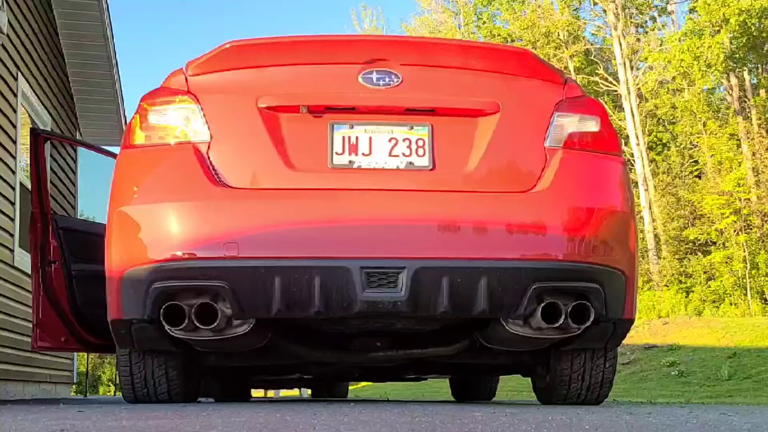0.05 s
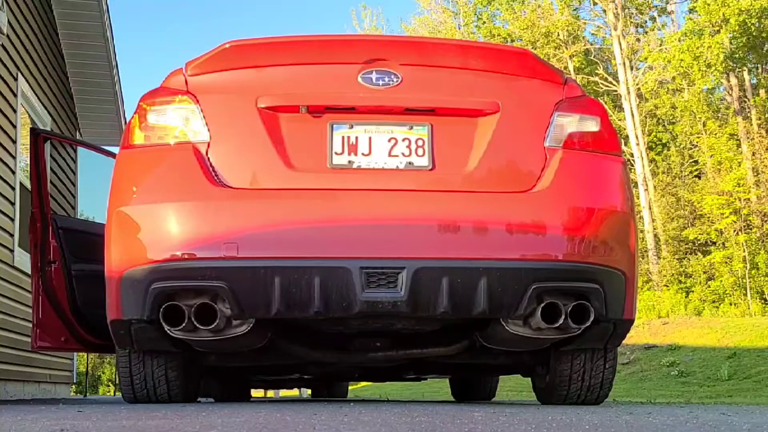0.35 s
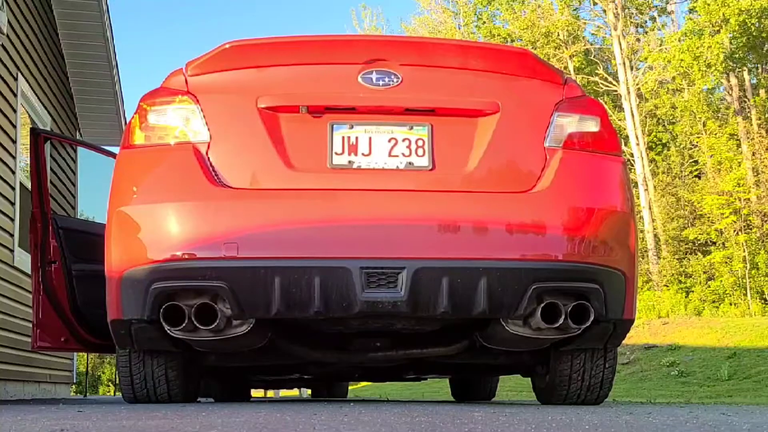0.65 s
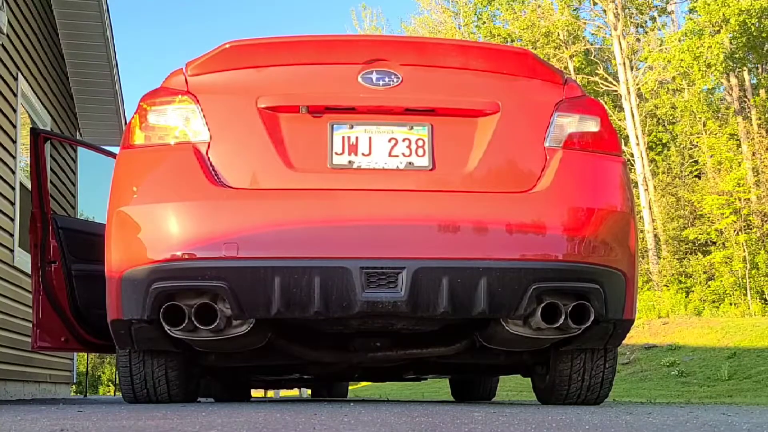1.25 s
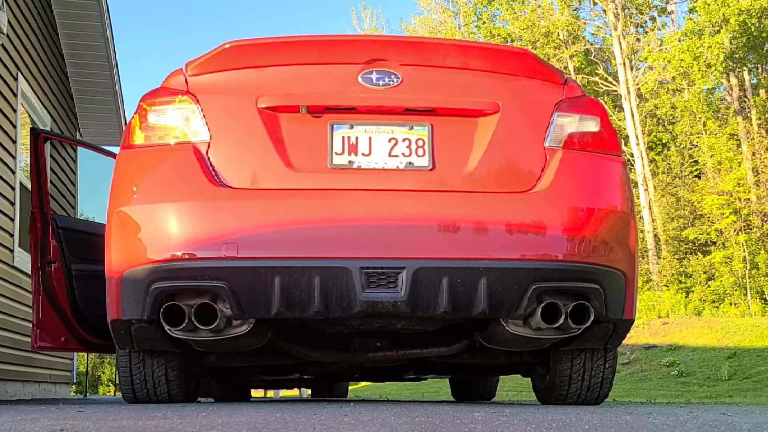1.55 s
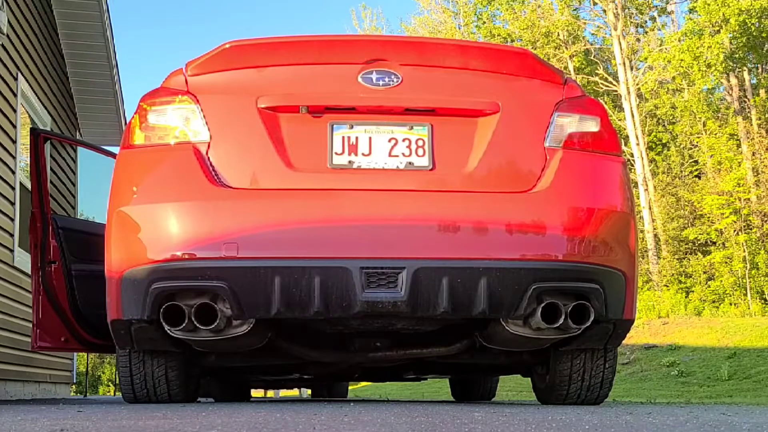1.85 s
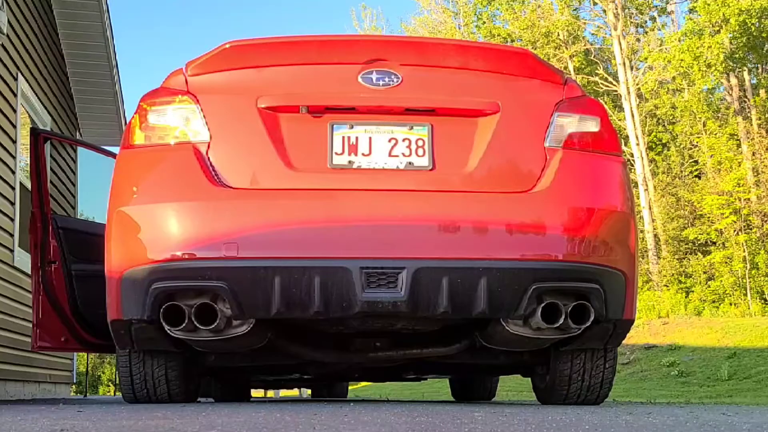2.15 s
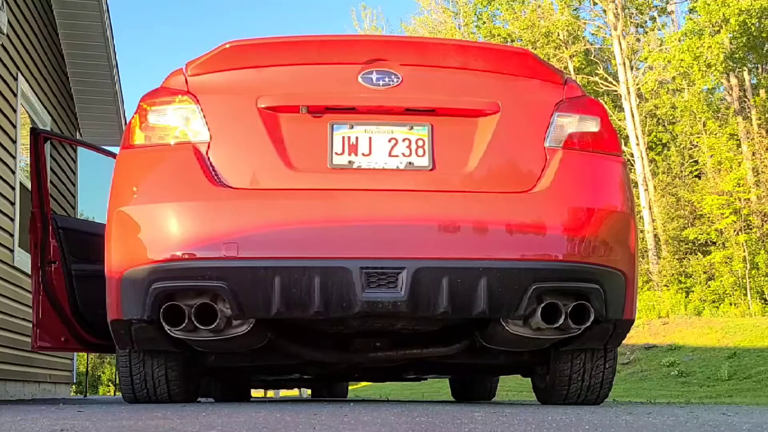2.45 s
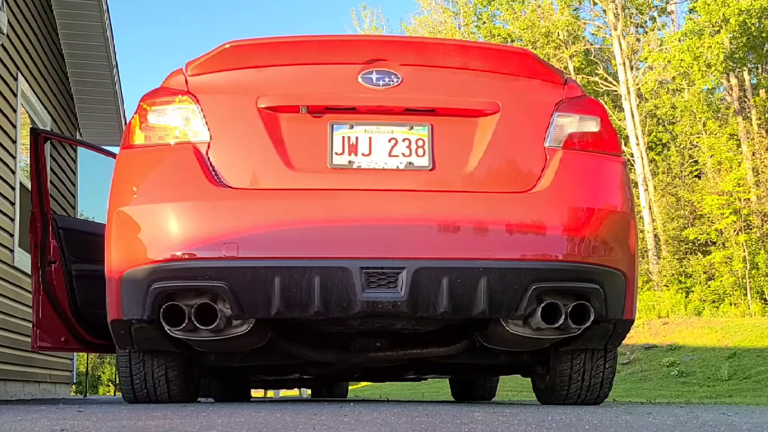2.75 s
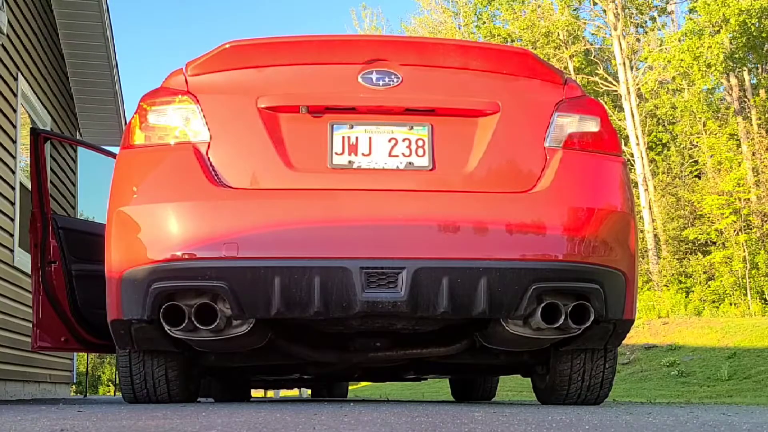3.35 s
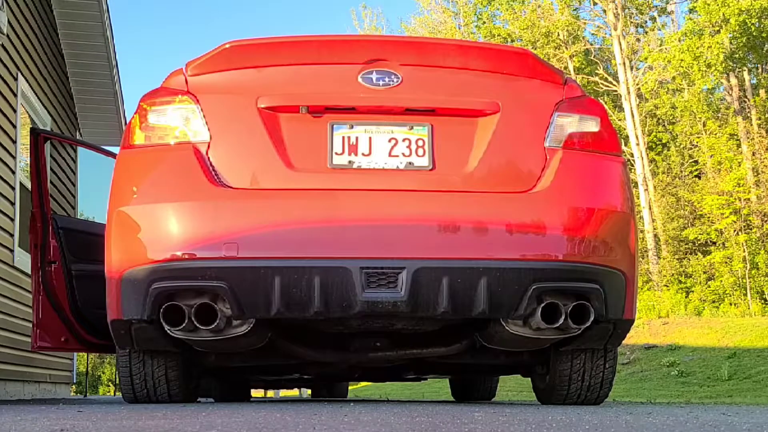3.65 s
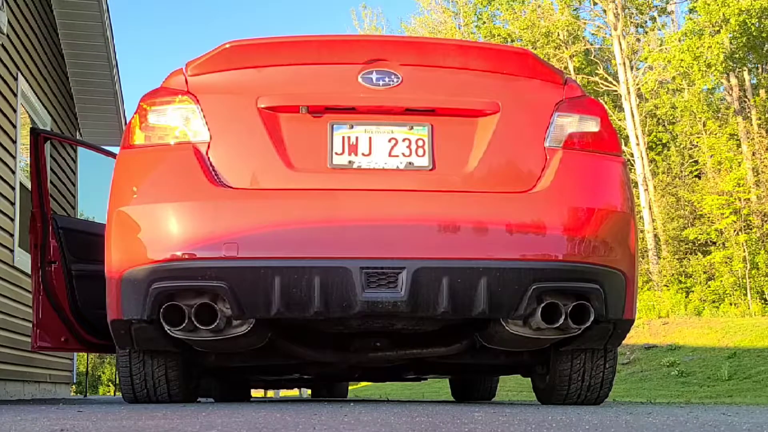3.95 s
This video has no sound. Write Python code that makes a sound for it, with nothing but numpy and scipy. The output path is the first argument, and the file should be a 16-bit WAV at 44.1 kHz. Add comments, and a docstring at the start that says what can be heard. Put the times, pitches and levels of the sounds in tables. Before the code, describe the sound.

A car engine cranks, catches with a boom, flares and drops to a raspy idle.

```python
"""Faint birdsong over quiet outdoor air, then cabin knocks and ignition clicks: a four-cylinder car is
started on a driveway beside a house, heard from just behind its tailpipes. The starter's gear teeth
grind and whine while unfired air throbs in the silencer. The engine catches with a boom, flares up as
its firing pulses ring the exhaust pipes, then drops to a harder, raspier fast idle."""
import sys
import numpy as np
from scipy import signal
from scipy.fft import rfft, irfft
from scipy.io import wavfile
from scipy.ndimage import uniform_filter1d, minimum_filter1d

SR = 44100
rng = np.random.default_rng(int(sys.argv[2]) if len(sys.argv) > 2 else 0)


def output_pcm(signal):
    """Save a mono or channel-first signal as 16-bit PCM at the path in sys.argv[1].

    Samples are clipped to [-1, 1] before scaling.
    """
    pcm = np.clip(np.atleast_2d(signal).T, -1, 1) * 32767
    wavfile.write(sys.argv[1], SR, np.round(pcm).astype(np.int16))


N = 176400
T = np.arange(N) / SR
FLARE_S = 2.653

# crankshaft speed: time_s, turns_per_s
CRANK_SPEED = [(2.27, 20), (2.45, 21), (2.49, 21.8), (2.555, 26.3), (2.6, 29), (2.68, 31.6), (2.772, 34.8),
               (2.908, 36.5), (3.018, 36.9), (3.118, 36.1), (3.348, 34.9), (3.426, 34), (3.526, 33.2),
               (3.886, 32.7), (4, 32.5)]


def amp(db):
    """Decibels to gain."""
    return 10 ** (np.asarray(db) / 20)


def unit(x):
    """Scale to rms 1."""
    return x / np.sqrt(np.mean(x ** 2) + 1e-20)


def curve(rows, column=1):
    """Table column, linearly interpolated over time."""
    rows = np.array(rows)
    return np.interp(T, rows[:, 0], rows[:, column])


def colour(x, rows):
    """Filter by rows of freq_hz, gain_db."""
    rows, hz = np.array(rows), np.fft.rfftfreq(2 * N, 1 / SR)
    gain_db = np.interp(np.log(hz + 1), np.log(rows[:, 0] + 1), rows[:, 1])
    return irfft(rfft(x, 2 * N) * amp(gain_db))[:N]


def noise():
    """White noise."""
    return rng.standard_normal(N)


def drift(hz):
    """Random wander below hz, rms 1."""
    return unit(irfft(rfft(noise()) * (np.fft.rfftfreq(N, 1 / SR) < hz), N))


def ring(x, modes):
    """Bank of band-pass resonances."""
    return sum(amp(db) * signal.lfilter(*signal.iirpeak(hz, hz / width, SR), x)
               for hz, width, db in modes)


def bursts(events, spectrum, decay_s, attack_s=0.00145):
    """Coloured noise that rises quickly to each event and dies away."""
    envelope = sum(amp(db) * np.exp(-abs(T - s) / np.where(T < s, attack_s, decay_s))
                   for s, db in events)
    return unit(colour(noise(), spectrum)) * envelope


def swell(start_s, rise_s, decay_s):
    """Soft-rising envelope, peak 1."""
    age_s = np.maximum(T - start_s, 0)
    shape = (1 - np.exp(-age_s / rise_s)) ** 2 * np.exp(-age_s / decay_s)
    return shape / shape.max()


def glide(rows, blur_hz):
    """Fuzzy whistle along rows of time_s, pitch_hz, level_db."""
    on = (T > rows[0][0]) * (T < rows[-1][0])
    tone = np.sin(2 * np.pi * np.cumsum(curve(rows)) / SR)
    return on * amp(curve(rows, 2)) * (0.5 + drift(blur_hz)) * tone


def scatter(x, decay_s):
    """Dense decaying reflections with a flat spectrum."""
    tail = rfft(noise()[:SR] * np.exp(-T[:SR] / decay_s))
    return signal.fftconvolve(x, irfft(tail / abs(tail))[:SR // 2])[:N]


def spread(x):
    """Ground and wall reflections widen the upper range."""
    # stereo image: freq_hz, side_minus_mid_db, left_minus_right_db
    image = [(170, -22.5, -1), (400, -7.5, -1), (1190, -8.5, -0.5), (2400, -1, -3), (4800, 2.5, 6.5),
             (15000, -1, 1.5)]
    side = colour(scatter(x, decay_s=0.011), image)
    left = colour(x + side, [(hz, lean / 2) for hz, _, lean in image])
    right = colour(x - side, [(hz, -lean / 2) for hz, _, lean in image])
    return np.array([left, right])


def direct(x, lag_s=0.00028):
    """Direct sound reaches the left microphone slightly early."""
    return np.array([np.interp(T + lag_s / 2, T, x) * amp(-0.9),
                     np.interp(T - lag_s / 2, T, x) * amp(0.38)])


def air(level_db=-56, sway_db=3):
    """Quiet outdoor air whose rumble comes and goes."""
    # air noise: freq_hz, gain_db
    spectrum = [(20, -17.5), (65, 4), (170, -6), (250, -13), (750, -17), (1100, -23.5), (2000, -27.5),
                (3000, -25), (6000, -38.5), (9000, -51), (15500, -51)]
    wash = unit(colour(noise(), spectrum))
    rumble = signal.sosfiltfilt(signal.butter(2, 220, fs=SR, output="sos"), wash)
    return amp(level_db) * (wash + rumble * (amp(sway_db * drift(18)) - 1))


def birds():
    """Distant gliding, fluttering calls, blurred by trees."""
    # calls, one list per phrase: time_s, pitch_hz, level_db
    phrases = [
        [(.12, 4610, -67.5), (.23, 5900, -64.5), (.32, 5590, -70.5), (.52, 5830, -68)],
        [(.36, 3170, -80), (.4, 2490, -69.5), (.6, 3290, -70)],
        [(.76, 3840, -72.5), (.84, 2330, -65), (.87, 3110, -54), (.92, 2740, -54), (.955, 3940, -62)],
        [(.49, 6570, -70), (.65, 7150, -72.5), (.93, 7300, -83)],
    ]
    # flutter bandwidth per phrase: blur_hz
    blurs_hz = [850, 260, 80, 330]
    song = sum(glide(phrase, hz) for phrase, hz in zip(phrases, blurs_hz))
    return song + amp(-4) * scatter(song, decay_s=0.05)


def cabin_knocks():
    """Dull knocks: soft swells of low noise."""
    # knocks: start_s, level_db
    knocks = [(.32, -55), (.47, -46), (0.512, -44), (0.889, -50)]
    # knock noise: freq_hz, gain_db
    spectrum = [(25, -10), (65, 5), (170, 0), (1000, -36), (4000, -60)]
    envelope = sum(amp(db) * swell(s, rise_s=0.014, decay_s=0.014) for s, db in knocks)
    return unit(colour(noise(), spectrum)) * envelope


def ignition_clicks():
    """The ignition clicks in short, bright bursts."""
    # clicks: time_s, level_db
    clicks = [(.979, -47), (1.022, -46), (1.034, -48), (1.138, -41.5)]
    # click noise: freq_hz, gain_db
    spectrum = [(150, -45), (250, -14), (427, 0.5), (1460, -10), (1790, -2.5), (6420, -9), (15500, -20)]
    return bursts(clicks, spectrum, decay_s=0.0094)


def heat_shield():
    """The heat shield rattles briefly under the car."""
    # rattles: time_s, level_db
    rattles = [(3.16, -30), (3.216, -30), (3.477, -30.5)]
    # rattle noise: freq_hz, gain_db
    spectrum = [(500, -26.5), (2000, 13), (7000, -9.5), (9000, -33), (16000, -29.5)]
    return bursts(rattles, spectrum, decay_s=0.026)


def starter(tooth_decay_s=0.0043, uneven_db=1.5):
    """Gear teeth grind, louder at each compression; the housing sings as the whine meets its pitch."""
    # cranking noise: time_s, grind_db, fizz_db
    levels = [(1.578, -57, -90), (1.588, -40, -53), (1.594, -25, -56), (1.63, -33.5, -65),
              (1.7, -37.5, -81), (1.9, -36.5, -66), (1.979, -40, -60), (1.988, -29, -69), (2.04, -32, -76),
              (2.07, -34.5, -61), (2.166, -39.5, -62), (2.174, -29.5, -61), (2.2, -32.5, -62),
              (2.237, -29, -50), (2.284, -37.5, -59.5), (2.301, -26.5, -46.5), (2.333, -30, -50.5),
              (2.44, -28.5, -45.5), (2.5, -37, -65.5), (2.6, -45.5, -81)]
    # gear: time_s, teeth_per_s, whine_db
    gear = [(1.58, 90, -55), (1.68, 128, -43), (1.725, 158, -40.5), (1.77, 167, -37), (1.85, 160, -36.5),
            (1.92, 146, -59), (2.03, 142, -45), (2.2, 136, -70)]
    # grinding noise: freq_hz, gain_db
    grind_spectrum = [(88, -41), (150, -13), (280, -8), (442, -27), (503, -25.5), (638, -6), (700, -9),
                      (1540, -4.5), (2180, -7.5), (2720, -10), (12000, -40.5), (15600, -64.5)]
    # grinding resonances: freq_hz, width_hz, gain_db
    grind_modes = [(437, 24, 0), (970, 87, -3.5), (1532, 70, 3), (2698, 69, 5)]
    # whine partials: tooth_rate_multiple, relative_db
    partials = [(7, 1), (28, -12.5), (34, -17.5), (42, -20.5), (67, -26)]
    # housing resonance: freq_hz, width_hz, gain_db
    housing_modes = [(651, 16, 25)]
    # top treble: freq_hz, gain_db
    fizz_spectrum = [(1000, -63.5), (9000, -21.5), (12000, 5), (13800, 13), (15500, 7.5)]
    # rising whistle: time_s, pitch_hz, level_db
    whistle = [(1.83, 4900, -60), (1.89, 6000, -55), (1.965, 7200, -56)]
    teeth = np.cumsum(curve(gear)) / SR
    tooth_age_s = teeth % 1 / curve(gear)
    tooth_gain = amp(uneven_db * noise()[teeth.astype(int)])
    bite = tooth_gain * (0.94 + np.exp(-tooth_age_s / tooth_decay_s))
    grind = unit(colour(bite * noise(), grind_spectrum))
    grind += amp(-3.5) * unit(ring(bite * noise(), grind_modes))
    whine = sum(amp(db + 3.5 * drift(70)) * np.sin(k * (2 * np.pi * teeth + 0.035 * drift(90)))
                for k, db in partials)
    whine_gain = amp(curve(gear, 2))
    housing = ring((teeth % 1 + noise() / 2) * whine_gain, housing_modes)
    fizz = unit(colour(bite * noise(), fizz_spectrum)) * amp(curve(levels, 2))
    cranking = unit(grind) * amp(curve(levels)) + whine * whine_gain + housing + fizz
    return (T > levels[0][0]) * cranking + glide(whistle, blur_hz=130)


def silencer_throb(pitch_hz=41.6):
    """During cranking, each puff of unfired air sets the silencer throbbing."""
    # air puffs: start_s, level_db
    puffs = [(1.65, -36), (1.805, -24), (1.921, -34), (2.005, -21), (2.119, -30.5), (2.181, -21.5)]
    return -sum(amp(db) * swell(s, rise_s=0.0068, decay_s=0.049) * np.sin(2 * np.pi * pitch_hz * (T - s))
                for s, db in puffs)


def chugs(turns, start_turn=0.72, peak_s=0.0062, start_hz=2060, rise_hz_per_s=12000):
    """Once a turn, a short breathy jet of gas rises in pitch in the tailpipe."""
    age_s = (turns - start_turn) % 1 / curve(CRANK_SPEED)
    envelope = (age_s / peak_s) ** 2 * np.exp(1 - (age_s / peak_s) ** 2)
    jet = np.sin(2 * np.pi * np.cumsum(start_hz + rise_hz_per_s * age_s) / SR)
    return envelope * (1 + drift(170) / 2) * jet


def barks():
    """The exhaust barks on the first firings and on the drop to idle."""
    # barks: time_s, level_db
    events = [(2.333, -34), (2.369, -19.5), (3.415, -21)]
    # bark noise: freq_hz, gain_db
    spectrum = [(150, -24.5), (430, 5.5), (1500, -26.5), (8000, -53.5)]
    return bursts(events, spectrum, decay_s=0.02)


def firing_pulses(turns, jitter_s=0.00006, uneven_db=1):
    """Two firings a turn, each slightly uneven in time and strength."""
    # cylinders in firing order: strength_db, delay_s
    cylinders = [(-0.5, 0), (-0.5, .00025), (-1, -.0001), (-3.5, .00035)]
    at = np.flatnonzero(np.diff(np.floor(2 * turns)))
    strength_db, delay_s = np.array(cylinders)[np.arange(len(at)) % len(cylinders)].T
    timing_error, strength_error = rng.standard_normal((len(at), 2)).T
    at += np.round((delay_s + jitter_s * timing_error) * SR).astype(int)
    pulses = np.zeros(N)
    pulses[np.clip(at, 0, N - 1)] = amp(strength_db + uneven_db * strength_error)
    return pulses


def exhaust(turns, puff_decay_s=0.013, roughness=0.72, lope_db=4.5, lope_peak_turn=1.27):
    """Each firing, a pulse plus a puff of gas, rings the pipes; the gas hisses out."""
    # exhaust levels: time_s, hum_db, rasp_db
    levels = [(2.32, -84, -71), (2.335, -16, -27.5), (2.375, -15.5, -26), (2.42, -13, -25),
              (2.49, -16.5, -25), (2.53, -10.5, -26.5), (2.62, -14, -23.5), (2.85, -21.5, -25),
              (3.12, -21.5, -22), (3.25, -17.5, -24), (3.4, -21.5, -32), (3.425, -25.5, -23),
              (3.55, -30, -24.5)]
    # low pipe resonances: freq_hz, width_hz, gain_db
    hum_modes = [(124.2, 11.6, 10.5), (422, 16.7, 10)]
    # upper pipe resonances: freq_hz, width_hz, gain_db
    rasp_modes = [(278.4, 51, -9), (584.3, 50, -2.5), (1222, 20.9, 8), (1386, 34.7, 5.5), (1793, 14, 0.5),
                  (2704, 13, -3.5), (3270, 44, -3.5)]
    # resonance that swells once in two turns: freq_hz, width_hz, gain_db
    lope_mode = [(754, 48.4, -2.5)]
    # rasp filter: freq_hz, gain_db
    rasp_tilt = [(50, -23), (230, -10), (300, 16), (2800, -7), (3600, -21.5), (8000, -41), (16000, -32.5)]
    # gas hiss: freq_hz, gain_db
    gas_spectrum = [(40, 20), (230, 1), (400, 5), (1000, 10), (2000, 3.5), (3000, -5.5), (4000, -16.5),
                    (6300, -15), (8500, -26.5), (15500, -27.5)]
    lit, running = T > levels[0][0], T > FLARE_S
    pulses = firing_pulses(turns)
    flow = 0.31 + unit(signal.lfilter([1], [1, -np.exp(-1 / (puff_decay_s * SR))], pulses))
    drive = unit(pulses) + roughness * unit(flow * noise())
    hum = colour(ring(drive, hum_modes), [(100, -23), (300, 6.5), (520, -2), (1000, -21.5)])
    hum *= amp(curve(levels)) / hum[running].std()
    lope = amp(lope_db * np.cos(np.pi * (turns - lope_peak_turn)))
    rasp = colour(ring(drive, rasp_modes) + lope * ring(drive, lope_mode), rasp_tilt)
    rasp /= rasp[running].std()
    rasp_gain = amp(curve(levels, 2))
    gas = unit(colour((0.47 + flow) * noise(), gas_spectrum))
    gas *= amp(-38) * np.sqrt(rasp_gain / rasp_gain[running].mean())
    low = lit * hum + barks()
    high = lit * ((rasp + amp(-9.5) * chugs(turns)) * rasp_gain + gas)
    return direct(low) + spread(high)


def engine_drone(turns, settle_s=3.37, fade_s=0.089, pipe_lag_s=0.00289, waver_db=1.5, waver_hz=21.3):
    """Engine orders: the booming firing tone, and overtones that shift as the flare ends."""
    # firing tone: time_s, level_db
    boom_levels = [(2.26, -43), (2.278, -15.5), (2.325, -15), (2.36, -2.5), (2.395, -25), (2.435, -9),
                   (2.48, -7.5), (2.53, -7.5), (2.59, -13.5), (2.63, -14), (2.85, -21), (3.02, -18),
                   (3.35, -24), (3.53, -19), (4, -19)]
    # its second and third harmonics before the flare: relative_db
    overtones_db = [-9.5, -20.5]
    # engine orders: crank_multiple, flare_db, idle_db
    orders = [(4, -41, -34.5), (6, -54, -31), (10, -37.5, -46), (10.5, -30.5, -56), (12, -14, -21),
              (13, -23.5, -51.5), (14, -32, -20.5), (16, -30, -62.5), (18, -46, -27.5),
              (22.5, -61.5, -30.5), (24, -57.5, -39), (37.16, -52.5, -39.5), (41.7, -67, -41)]
    flare = np.clip((T - FLARE_S) / fade_s, 0, 1)
    idle = np.clip((T - settle_s) / fade_s, 0, 1)
    firing_rad = 2 * np.pi * 2 * turns
    overtones = sum(amp(db) * np.cos(k * firing_rad + (k - 1) * np.pi / 2)
                    for k, db in enumerate(overtones_db, start=2))
    boom = np.cos(firing_rad) + (1 - flare) * overtones
    boom *= (T > boom_levels[0][0]) * amp(curve(boom_levels))
    lagged_turns = np.interp(T - pipe_lag_s, T, turns)
    tones = np.zeros(N)
    for multiple, flare_db, idle_db in orders:
        gain = amp(flare_db) * (1 - idle) + amp(idle_db) * idle
        tone = np.cos(np.pi * round(2 * multiple) * lagged_turns)  # nearest half order
        tones += gain * amp(waver_db * drift(waver_hz)) * tone
    return np.sqrt(2) * direct(boom + flare * tones)


def scene():
    """The car over birds and outdoor air."""
    turns = np.cumsum(curve(CRANK_SPEED) * (T > CRANK_SPEED[0][0])) / SR
    engine = engine_drone(turns) + exhaust(turns) + direct(silencer_throb())
    car_parts = starter() + ignition_clicks() + cabin_knocks() + heat_shield()
    return engine + spread(car_parts + birds() + air())


def record(dry, silence_s=0.111, fade_out_s=0.004, cutoff_hz=15850):
    """Brief opening silence, peak limiter and band limit."""
    headroom = 1 / np.maximum(abs(dry).max(0), 1)
    limiter_gain = uniform_filter1d(minimum_filter1d(headroom, size=600), size=600)
    dry = signal.sosfilt(signal.butter(1, 8, "high", fs=SR, output="sos"), dry)
    gate = (T > silence_s) * np.minimum((T[-1] - T) / fade_out_s, 1)
    lowpass = signal.firwin(511, cutoff_hz, window=("kaiser", 9), fs=SR)
    return signal.oaconvolve(dry * limiter_gain * gate, lowpass[None], "same")


dry = scene()
out = record(dry)
output_pcm(out)
```